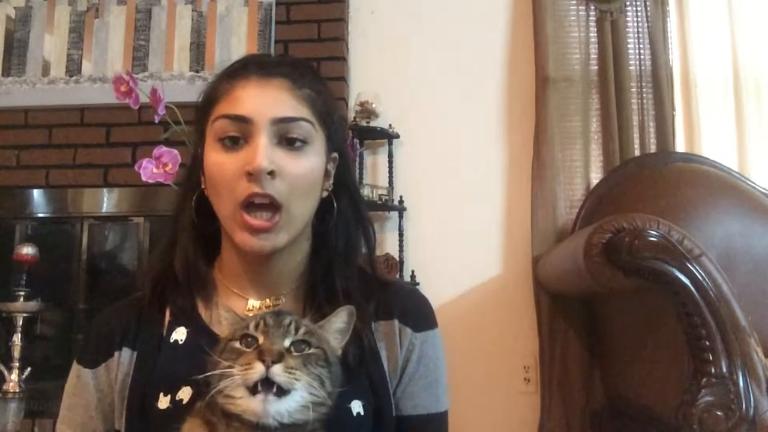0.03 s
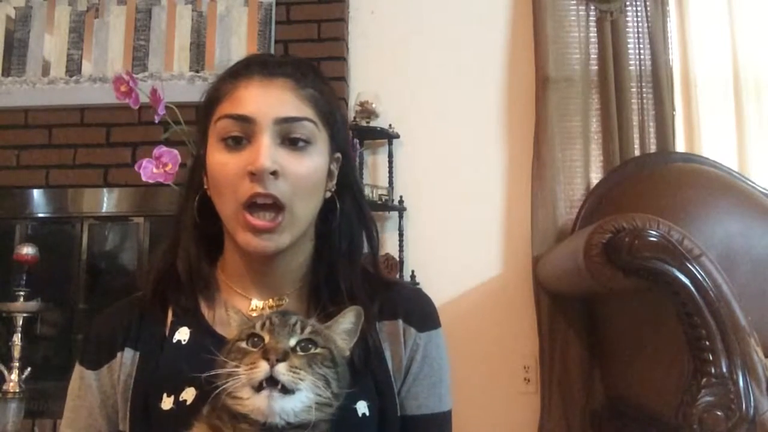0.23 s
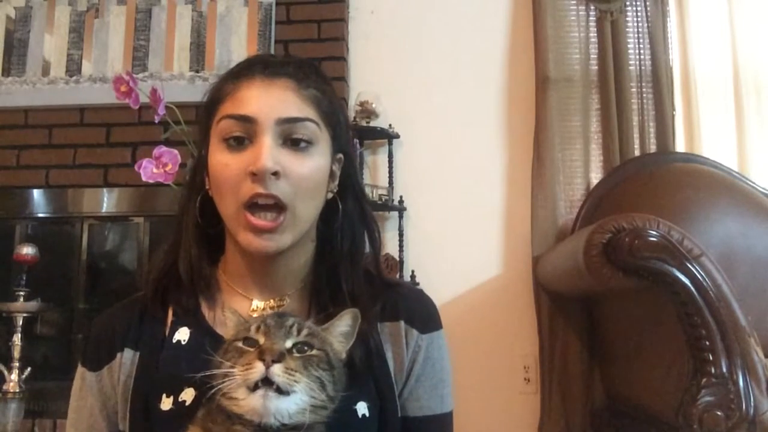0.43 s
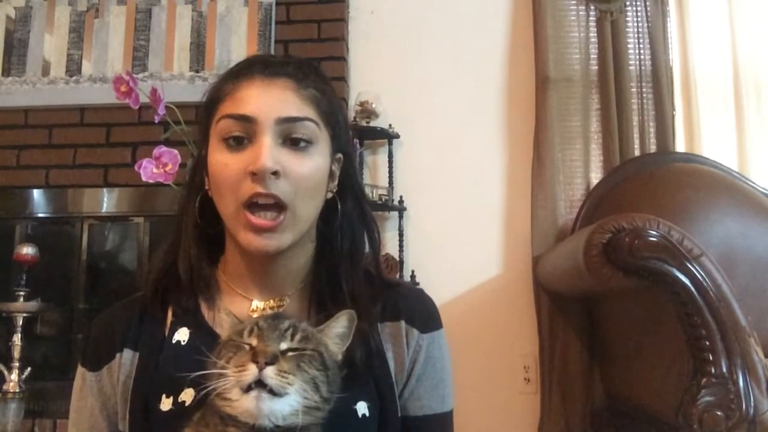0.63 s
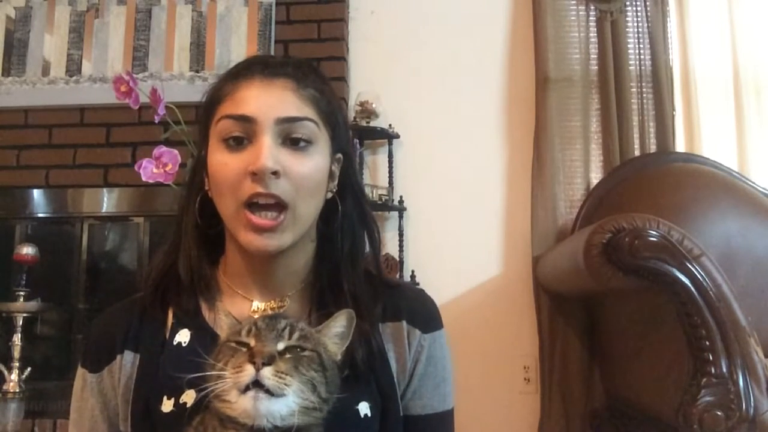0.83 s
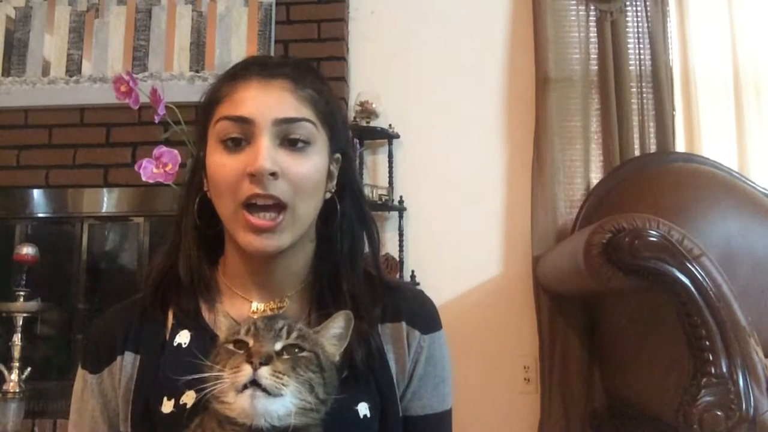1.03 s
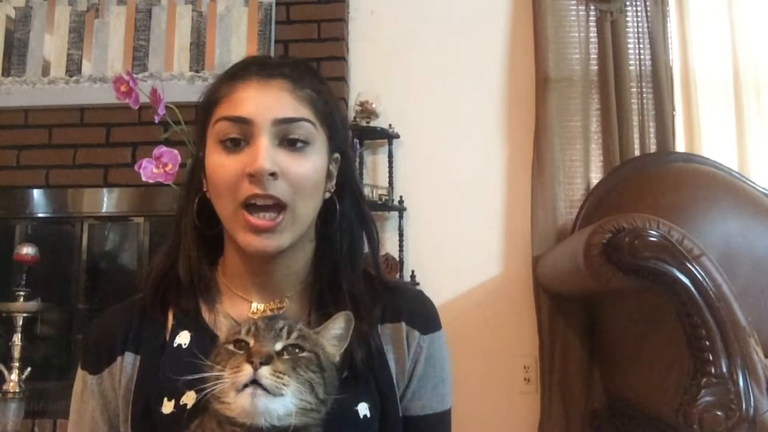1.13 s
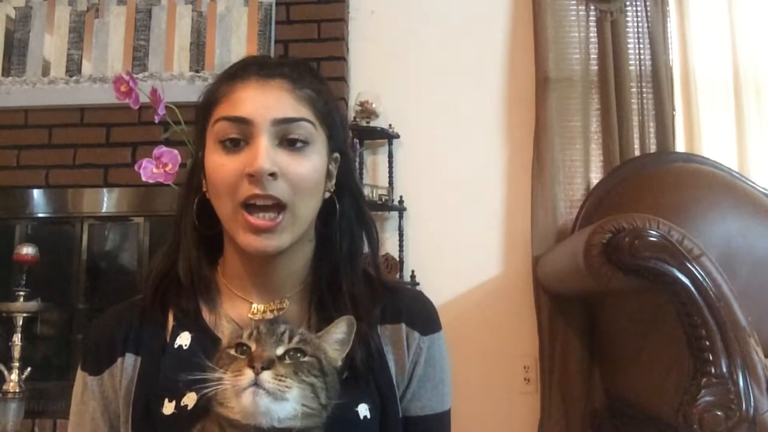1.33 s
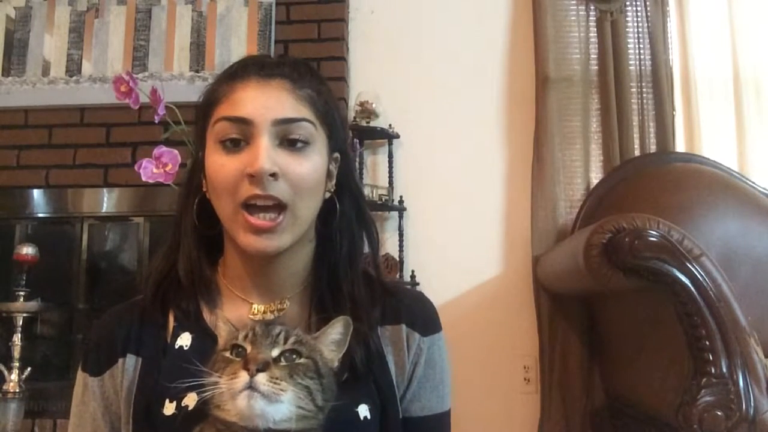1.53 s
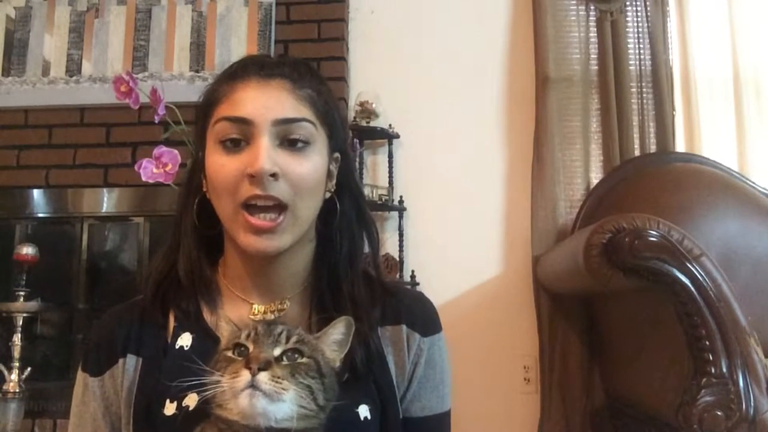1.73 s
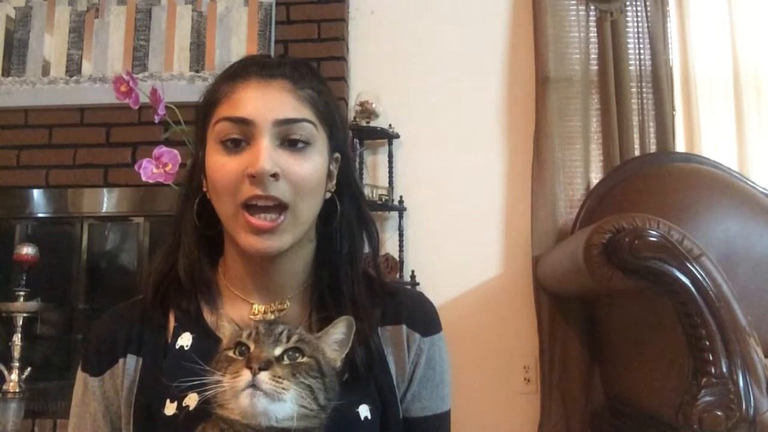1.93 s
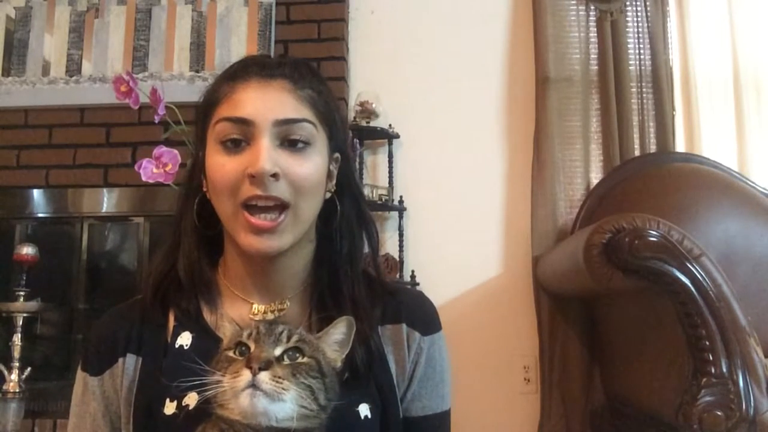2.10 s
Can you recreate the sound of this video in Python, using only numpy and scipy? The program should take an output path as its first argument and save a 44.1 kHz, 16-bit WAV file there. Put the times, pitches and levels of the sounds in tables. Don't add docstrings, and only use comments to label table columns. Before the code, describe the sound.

A cat's long, close meow holds level, then sags in pitch and shuts off indoors

```python
import sys
import numpy as np
from scipy import signal
from scipy.fft import rfft, irfft, next_fast_len
from scipy.io import wavfile
from scipy.ndimage import uniform_filter1d, map_coordinates

SR = 44100
rng = np.random.default_rng(int(sys.argv[2]) if len(sys.argv) > 2 else 0)


def field_ratio(decibels):
    return 10 ** (np.asarray(decibels, dtype=float) / 20)


def inscribe(sig):
    pcm = np.round(np.clip(np.atleast_2d(sig).T, -1, 1) * 32767)
    wavfile.write(sys.argv[1], SR, pcm.astype(np.int16))


N = 95388
LEAD = SR // 2

# t/s, effort/dB, mouth resonance f/Hz, tongue resonance level/dB, flutter [0-1]
MEOW = [
    (0, -22, 1725, -12, 0.17),
    (.12, -25.5, 1732, -10.5, 0.48),
    (.35, -29, 1789, -8.5, 0.37),
    (.53, -27.5, 1826, 2.5, 0.34),
    (.62, -28, 1467, -3.5, 1.19),
    (.92, -28, 1523, -2, 0.63),
    (1.08, -29, 1322, -3, 1.04),
    (1.14, -29.5, 1125, -1, 0.91),
    (1.175, -54, 950, -2.5, 0.96),
]


def unit(x):
    return x / np.sqrt(np.mean(x ** 2) + 1e-20)


def along(points, hz):
    f, v = np.transpose(points)
    return np.interp(np.log(hz + 1), np.log(f + 1), v)


def clock():
    return np.arange(-LEAD, N) / SR


def curves(rows):
    s, *columns = np.transpose(rows)
    return [np.interp(clock(), s, column) for column in columns]


def wobble(rate_hz):
    m = N + LEAD
    knots = rng.standard_normal(int(m * rate_hz / SR) + 4)
    return map_coordinates(knots, [np.arange(m) * rate_hz / SR])


def shaped_noise(gain_at):
    m = next_fast_len(N + LEAD)
    spectrum = rfft(rng.standard_normal(m)) * gain_at(np.fft.rfftfreq(m, 1 / SR))
    return unit(irfft(spectrum, m)[:N + LEAD])


def noise(points):
    return shaped_noise(lambda hz: field_ratio(along(points, hz)))


def peak(f, hz, width_hz):
    return 1j * f * width_hz / (hz * hz - f * f + 1j * f * width_hz)


def meow():
    # t/s, f/Hz
    pitch_points = [
        (0, 568.5),
        (.13, 559.5),
        (.54, 561.8),
        (.63, 540.2),
        (.72, 539),
        (.89, 532.4),
        (1.03, 502),
        (1.1, 470.5),
        (1.16, 434.7),
    ]
    # f/Hz, width/Hz, level/dB, share of pitch drop followed [0-1+]
    throat = [(1060, 1370, -20.5, 0.34), (3120, 300, -8, 1.2), (4930, 380, -23, 0.17),
              (7127, 850, -17, 0.24), (7700, 420, -47, 0)]
    # f/Hz, level/dB
    outlet = [(400, -28), (560, 7.5), (1100, 9), (3000, -5.5), (8700, -14), (9100, -43), (15000, -46)]
    # f/Hz, level/dB
    low_cut = [(430, -36), (490, 4.5), (560, -0.5)]
    # f/Hz, level/dB
    breath = [(500, -36), (1200, -31), (1700, -29), (2500, -19), (3500, -23), (4800, -7), (7000, -4),
              (10000, 0)]
    mouth_width_hz, tongue_hz, tongue_width_hz = 308, 2317, 154
    jitter, fast_jitter, shimmer_db, own_db = .0045, .004, .8, 3.2
    tongue_share, edge_share = 0.99, .75
    dulling_db = 74.5

    on = clock() < MEOW[-1][0]
    pitch_hz = curves(pitch_points)[0][on]
    effort_db, mouth_hz, tongue_db, flutter = (c[on] for c in curves(MEOW))
    drop = pitch_hz / pitch_hz[0]
    sink = drop ** tongue_share
    unsteady = jitter * wobble(50) + fast_jitter * wobble(250)
    pitch_hz = pitch_hz * (1 + flutter * unsteady[on])
    phase = 2 * np.pi * np.cumsum(pitch_hz) / SR
    air = wobble(500) + 1j * wobble(500)
    own = wobble(70)
    tone = 0
    for k in range(1, 30):
        f = k * pitch_hz
        mouth = peak(f, mouth_hz, mouth_width_hz) ** 2
        gain = abs(mouth) + field_ratio(tongue_db) * abs(peak(f, tongue_hz * sink, tongue_width_hz)) ** 2
        for hz, width_hz, db, share in throat:
            gain = gain + field_ratio(db) * abs(peak(f / drop ** share, hz, width_hz)) ** 2
        level_db = along(outlet, f / drop ** edge_share) + along(low_cut, f)
        level_db = level_db - dulling_db * (1 - drop) * abs(peak(f, 3300 * sink, 1800)) ** 2
        level_db = level_db + own_db * min(1, k / 4) * flutter * np.roll(own, k * 9001)[on]
        smear = field_ratio(along(breath, f)) * (.6 + .7 * flutter) * np.roll(air, k * 3001)[on]
        carrier = np.exp(1j * (k * phase + np.angle(mouth) / 4))
        tone = tone + gain * field_ratio(level_db) * np.real((1 + smear) * carrier)
    out = np.zeros(len(on))
    out[on] = np.sqrt(2) * field_ratio(effort_db + shimmer_db * flutter * wobble(60)[on]) * tone
    return out


def nose():
    # f/Hz, width/Hz, level/dB
    passages = [(10690, 1700, -2), (12500, 450, -12.5), (14160, 1400, 0.5)]
    effort_db = uniform_filter1d(np.roll(curves(MEOW)[0], SR // 20), SR // 20)
    hiss = shaped_noise(lambda hz: sum(field_ratio(db) * abs(peak(hz, c, w)) ** 6 for c, w, db in passages))
    return field_ratio(-48 + effort_db + 0.73 * wobble(13)) * hiss * (clock() > -.4)


def mouth_shuts():
    shut_s, thud_hz, thud_db, thud_rise_s = 1.148, 407.3, -33.5, 0.011
    puff_db, puff_length_s = -58, .065
    since_s = np.clip(clock() - shut_s, 0, None)
    u = since_s / thud_rise_s
    thud = field_ratio(thud_db) * u ** 2 * np.exp(2 - 2 * u) * np.sin(2 * np.pi * thud_hz * clock())
    v = since_s / puff_length_s * 3
    air = noise([(500, -17), (2000, -4), (4200, -7), (4750, 0), (5300, -7), (14500, -24.5), (15500, -56)])
    return thud + field_ratio(puff_db) * v * np.exp(1 - v) * air


def lips():
    # t/s, peak level/dB
    clicks = [
        (1.377, -35),
    ]
    # f/Hz, level/dB, t60/s
    modes = [(1304, -4, 0.022), (1834, -2, 0.022), (2936, 13, 0.004), (3400, -5, 0.0052),
             (4440, -14, 0.0077), (6530, -43, 0.0065)]
    out = 0
    for s, db in clicks:
        t = np.clip(clock() - s, 0, None)
        ring = sum(field_ratio(mode_db - 60 * t / t60) * np.sin(2 * np.pi * hz * t) for hz, mode_db, t60 in modes)
        wet = noise([(300, 7), (1000, 5.5), (4000, -5.5), (14000, -16.5)])
        burst = 2.0 * field_ratio(-60 * t / 0.0076) * wet
        out = out + field_ratio(db - 7.5) * (1 - np.exp(-t / 0.0018)) * (ring + burst)
    return out


def room(x):
    # f/Hz, t60/s
    decay = [(300, 0.39), (1500, 0.71), (3000, 1), (4700, 0.32), (12000, 0.077)]
    # f/Hz, level/dB
    colour = [(400, -2), (900, 2), (1100, -4), (1430, 5), (1680, -3), (2100, -4), (3500, -1), (4750, 7)]
    level_db, delay_s = -14.5, .011
    hz, t, z = signal.stft(rng.standard_normal(SR), SR, nperseg=256)
    tail_db = along(colour, hz)[:, None] - 60 * t / along(decay, hz)[:, None]
    tail = signal.istft(z * field_ratio(tail_db), SR, nperseg=256)[1]
    tail = np.pad(tail, (round(delay_s * SR), 0))
    return field_ratio(level_db) * signal.fftconvolve(x, tail / np.linalg.norm(tail))[:len(x)]


def hum():
    # f/Hz, level/dB per Hz
    spectrum = [(25, -32), (75, -0.5), (230, -9.5), (320, -6), (780, -17), (1400, -22.5), (2800, -35),
                (15500, -43.5), (16000, -120)]
    return field_ratio(-58 - 1.6 * wobble(5.506)) * noise(spectrum)


def scene():
    cat = meow() + nose() + mouth_shuts() + lips()
    return (cat + room(cat) + hum())[None, LEAD:]


def top_cut(x):
    return signal.sosfilt(signal.butter(12, 15310, fs=SR, output="sos"), x)


def record(dry):
    return top_cut(dry)


dry = scene()
out = record(dry)
inscribe(out)
```